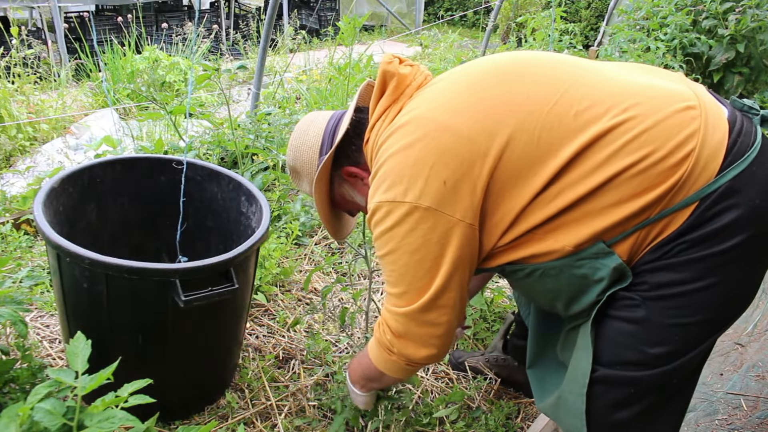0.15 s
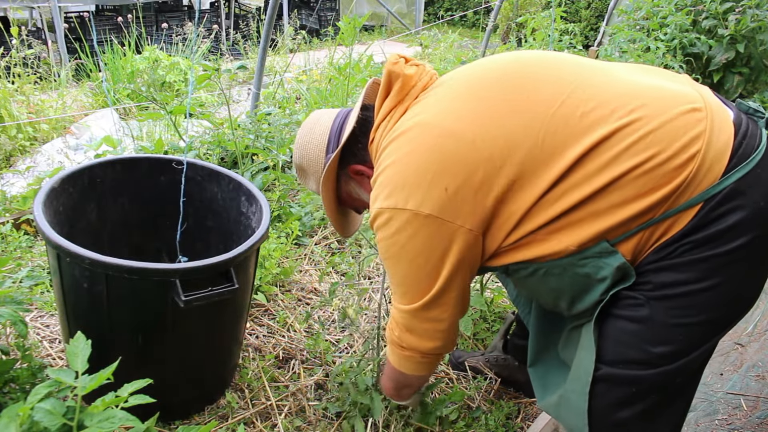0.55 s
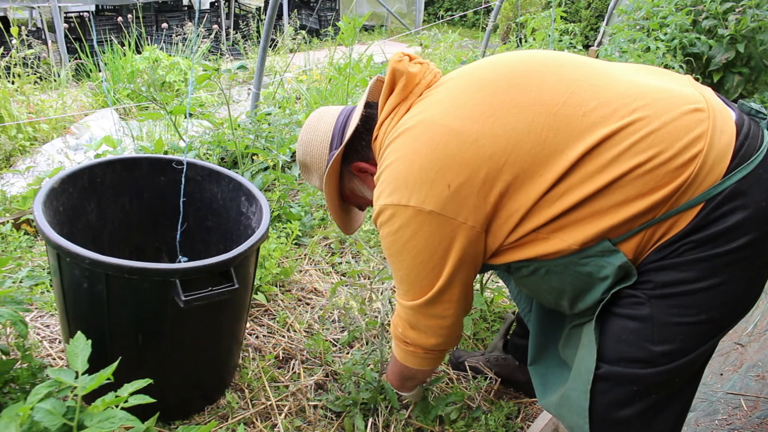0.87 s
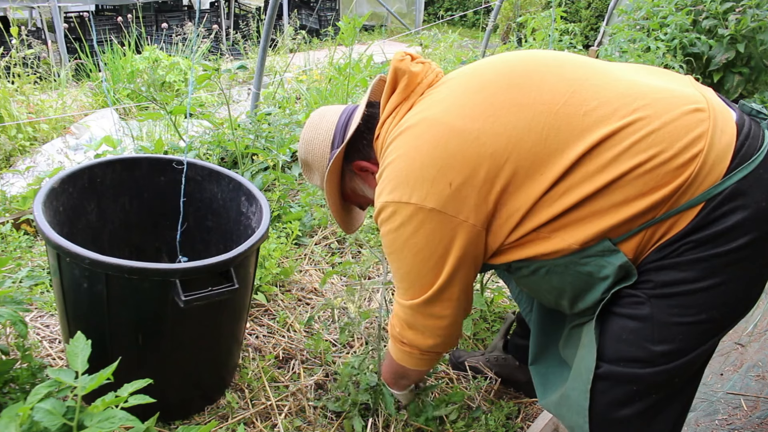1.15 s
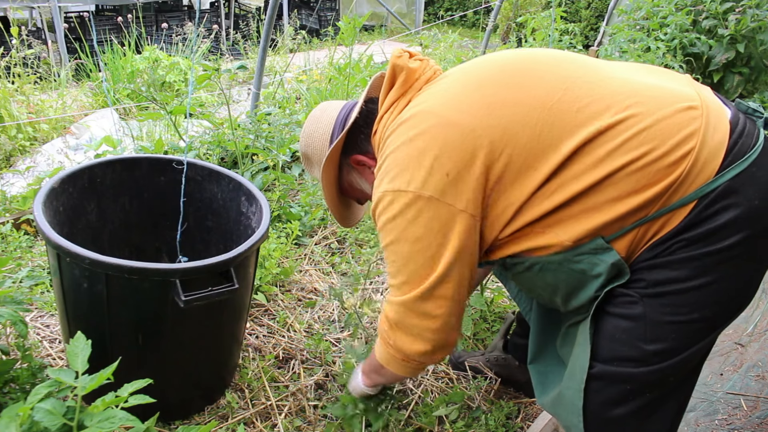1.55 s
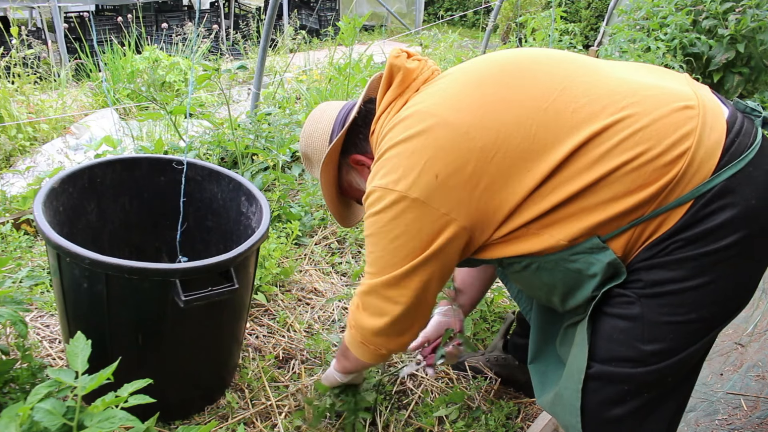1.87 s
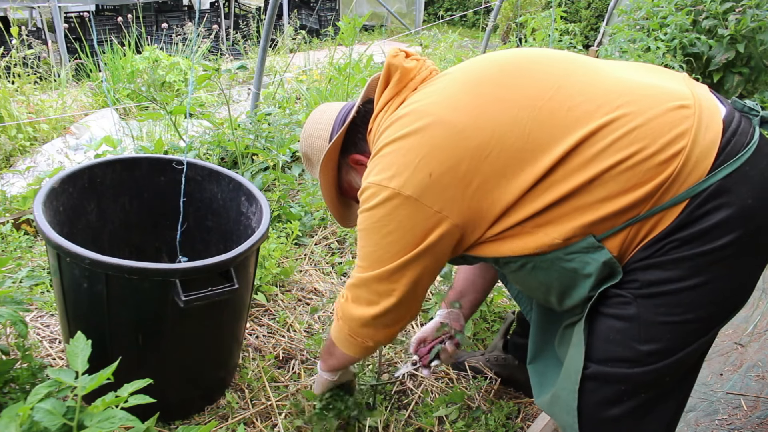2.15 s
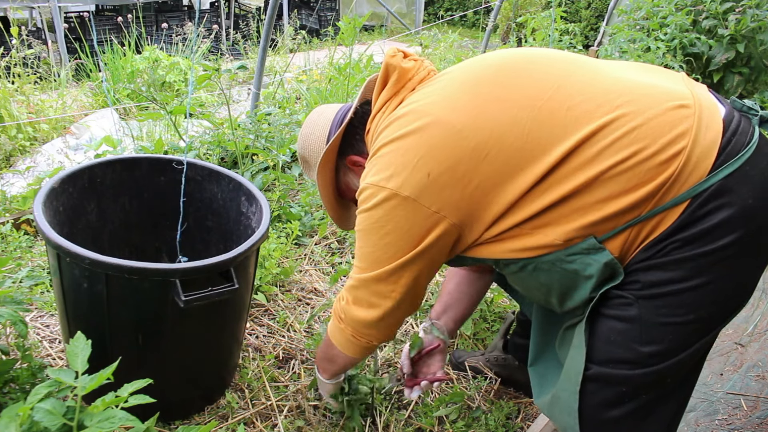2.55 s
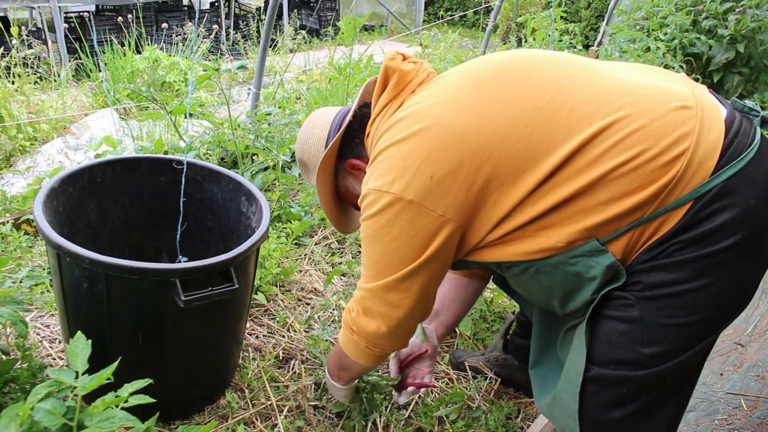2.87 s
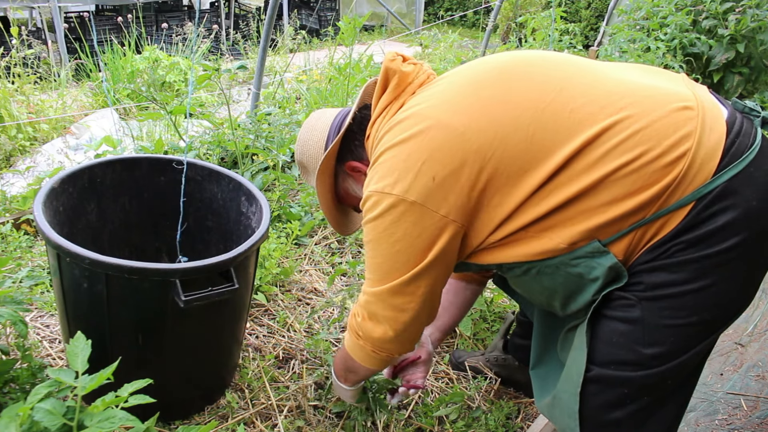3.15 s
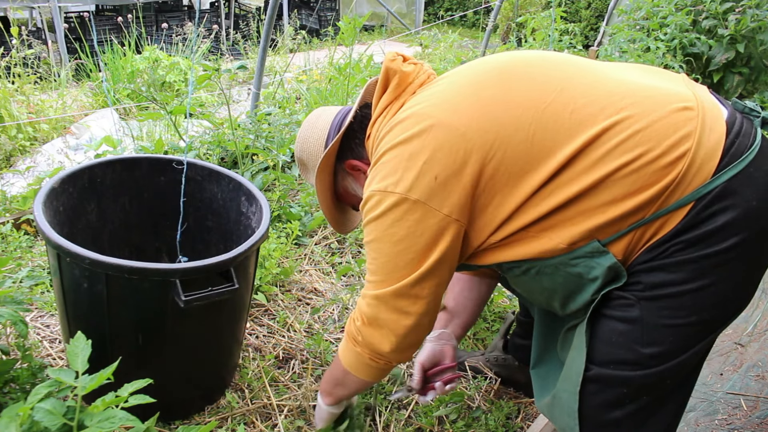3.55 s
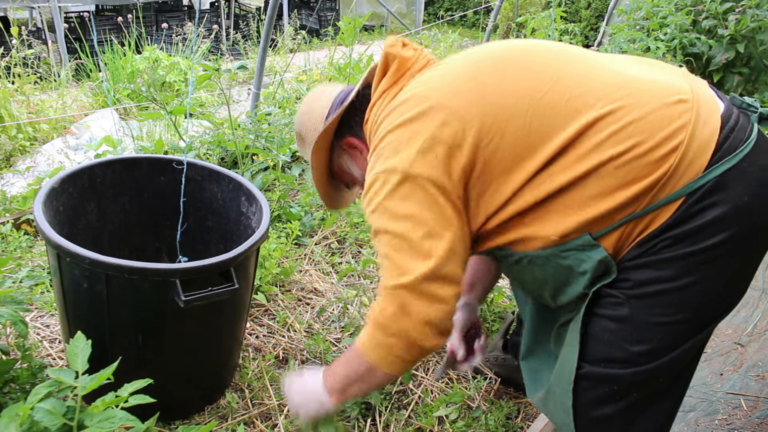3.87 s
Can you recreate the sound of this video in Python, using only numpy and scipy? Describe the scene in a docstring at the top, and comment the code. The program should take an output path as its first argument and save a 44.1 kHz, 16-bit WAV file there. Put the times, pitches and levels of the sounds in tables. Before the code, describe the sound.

Hand pruning shears cut two plant shoots, about two seconds apart, each with a crunch and a sharp snap close by. Leaves rustle softly between the cuts, and birds sing faintly outside a quiet greenhouse.

```python
"""Quiet greenhouse air, a camera's faint buzz and lens ticks, leaves rustling under a gardener's hands.
Birds sing outside: gliding whistles with the garden's echo.
Pruning shears cut two shoots: fibres crunch as the blade bites, then the stem snaps and splinters.
Dry stalks flick against each other now and then."""
import sys
import numpy as np
from scipy import signal
from scipy.fft import rfft, irfft, next_fast_len
from scipy.io import wavfile
from scipy.ndimage import uniform_filter1d

SR = 44100
rng = np.random.default_rng(int(sys.argv[2]) if len(sys.argv) > 2 else 0)


def master(y):
    """Save y as 16-bit WAV."""
    cut = np.clip(np.atleast_2d(y).T, -1, 1)
    pcm = np.round(cut * 32767)  # scale
    wavfile.write(sys.argv[1], SR, pcm.astype(np.int16))


N = 176400

# garden reverberation: freq_hz, t60_s
GARDEN_DECAY = [(500, 0.84), (2000, 0.39), (5000, 0.53)]


def amp(db):
    """Decibels to gain."""
    return 10 ** (np.asarray(db) / 20)


def unit_rms(x):
    """Scales to rms 1."""
    return x / np.sqrt(np.mean(abs(x) ** 2) + 1e-20)


def curve_at(points, hz):
    """Interpolates a table over log frequency."""
    freq_hz, value = np.transpose(points)
    return np.interp(np.log(hz + 1), np.log(freq_hz + 1), value)


def add(mix, start_s, sound):
    """Mixes a sound in at start_s."""
    part = mix[max(round(start_s * SR), 0):][:len(sound)]
    part += sound[:len(part)]


def colour(x, spectrum, tilt_db_per_oct=0):
    """Filters by a spectrum, tilted above 500 Hz; output rms 1."""
    hz = np.fft.rfftfreq(len(x), 1 / SR)
    octaves = np.log2(np.maximum(hz, 500) / 3000)
    gain = amp(curve_at(spectrum, hz) + tilt_db_per_oct * octaves)
    return unit_rms(irfft(rfft(x) * gain, len(x)))


def grains(n, per_s, spread_db):
    """Random clicks of uneven size."""
    size = amp(spread_db * np.minimum(rng.exponential(1, n), 4))
    return size * rng.choice([-1, 1], n) * (rng.random(n) < per_s / SR)


def decay(t, t60_s):
    """Envelope falling 60 dB in t60_s."""
    return amp(-60 * t / t60_s)


def reverb(x, decays):
    """Diffuse tail, each band dying at its own rate."""
    hz, t, noise = signal.stft(rng.standard_normal(SR // 2), SR, nperseg=256)
    tail = signal.istft(noise * decay(t, curve_at(decays, hz)[:, None]), SR, nperseg=256)[1]
    tail *= np.minimum(np.arange(len(tail)) / SR / 0.00082, 1)
    return signal.fftconvolve(x, tail / np.linalg.norm(tail))[:N]


def ping(t, hz, t60_s):
    """One damped mode."""
    return np.sin(2 * np.pi * hz * t) * decay(t, t60_s)


def whistle(length_s, first_hz, middle_hz, last_hz, level_db, blur_hz, taper):
    """Gliding tone; blur_hz scatters amplitude and phase, taper rounds the ends."""
    progress = np.linspace(0, 1, max(round(length_s * SR), 8))
    pitch_hz = np.polyval(np.polyfit([0, .5, 1], [first_hz, middle_hz, last_hz], 2), progress)
    carrier = np.exp(2j * np.pi * np.cumsum(pitch_hz) / SR)
    offset_hz = np.fft.fftfreq(next_fast_len(len(progress) + SR // 2), 1 / SR)
    sidebands = np.exp(2j * np.pi * rng.random(len(offset_hz)) - (offset_hz / blur_hz) ** 2)
    scatter = unit_rms(np.fft.ifft(sidebands)[:len(progress)])
    envelope = abs(np.sin(np.pi * progress)) ** taper
    return amp(level_db) * unit_rms((scatter * carrier).real * envelope)


def air(level_db=-51, patch_db=.9):
    """Soft stereo wash and hiss, drifting in patches."""
    # air spectrum: freq_hz, density_db
    spectrum = [(20, 1), (45, -4.5), (100, -4), (250, -7), (550, -6), (1000, -8), (2000, -11.5),
                (4200, -13), (5600, -14), (9000, -16.5), (15500, -14.5)]
    # left-right likeness: freq_hz, correlation
    likeness = [(50, 0.87), (200, 0.87), (600, 0.844), (2500, 0.9826), (5000, 0.93), (8000, 0.3),
                (14000, 0.31)]
    frames, hz = N // 256 + 5, np.fft.rfftfreq(1024, 1 / SR)
    re, im, side_re, side_im, patches = rng.standard_normal((frames, len(hz), 5)).T
    patches = unit_rms(uniform_filter1d(uniform_filter1d(patches, size=12, axis=0), size=18, axis=1))
    correlation = curve_at(likeness, hz)[:, None]
    left = re + 1j * im
    right = correlation * left + np.sqrt(1 - correlation ** 2) * (side_re + 1j * side_im)
    gain = amp(curve_at(spectrum, hz)[:, None] + patch_db * patches)
    wash = signal.istft(np.array([left, right]) * gain, nperseg=1024, noverlap=768)[1]
    return amp(level_db) * unit_rms(wash[:, :N])


def camera_buzz(level_db=-57.5, scan_hz=69.58, spike_hz=1025, spikes_per_scan=6):
    """The electronics leak a burst of spikes and hiss on every scan."""
    # buzz spectrum: freq_hz, gain_db
    spectrum = [(1000, -40), (3000, -7.5), (6000, -2), (9200, 0.5), (12300, -1.5), (15500, -11)]
    offset_scans, scan_jitter_s, spike_jitter_s = .29, 5e-5, 1e-5
    scans_s = (np.arange(int(N / SR * scan_hz)) + offset_scans) / scan_hz
    scans_s += rng.normal(0, scan_jitter_s, len(scans_s))
    spikes_s = scans_s[:, None] + np.arange(spikes_per_scan) / spike_hz
    spikes_s += rng.normal(0, spike_jitter_s, spikes_s.shape)
    spikes = np.zeros(N)
    spikes[np.round(spikes_s * SR).astype(int) % N] = 1
    in_burst = (np.arange(N) / SR * scan_hz - offset_scans) % 1 < spikes_per_scan * scan_hz / spike_hz
    hiss = 0.102 * in_burst * rng.standard_normal(N)
    return amp(level_db) * colour(spikes - spikes.mean() + hiss, spectrum)


def lens_ticks(level_db=-46, cycle_s=.36, step_s=.08, t60_s=0.031):
    """The focus motor ticks softly in groups of four."""
    # lens resonances: freq_hz, gain_db
    modes = [(470, -5), (720, -1.5), (950, -7)]
    out, t = np.zeros(N), np.arange(SR // 25) / SR
    for group_s in np.arange(.006, N / SR, cycle_s):
        for step in range(4):
            tick = sum(amp(db) * ping(t, hz * rng.normal(1, 0.0263), t60_s) for hz, db in modes)
            add(out, group_s + step * step_s, amp(rng.normal(level_db, 2.2)) * tick)
    return out


def leaves():
    """Swells of fine crackle as hands part the plants."""
    # Gaussian swells: centre_s, sigma_s, level_db, tilt_db_per_oct
    rustles = [(.13, 0.17, -62, -30), (0.428, 0.046, -53, 5), (1.622, 0.078, -49.5, 4),
               (1.982, 0.095, -50, 4.5), (2.143, 0.035, -48.5, 4.5), (2.458, 0.15, -51, 2),
               (3.309, 0.013, -44, 18), (3.508, 0.053, -47.5, 7.5), (3.818, 0.13, -47.5, 4.5)]
    # leaf spectrum: freq_hz, gain_db
    spectrum = [(100, 1.5), (400, 5.5), (1300, 12), (3500, 8), (6000, -6.5), (9000, -14), (11500, -11),
                (15000, -17)]
    out, t = np.zeros(N), np.arange(-SR // 4, SR // 4) / SR
    for centre_s, sigma_s, level_db, tilt_db_per_oct in rustles:
        crackle = colour(grains(len(t), per_s=1700, spread_db=3.2), spectrum, tilt_db_per_oct)
        add(out, centre_s + t[0], amp(level_db) * crackle * np.exp(-(t / sigma_s) ** 2 / 2))
    return out


def garden_whistles(notes, wet_db, taper):
    """Single bird notes with the garden's echo."""
    out = np.zeros(N)
    for start_s, *shape in notes:
        add(out, start_s, whistle(*shape, taper))
    return out + amp(wet_db) * reverb(out, GARDEN_DECAY)


def far_birds():
    """Whistles blurred by distance."""
    # far notes: start_s, length_s, first_hz, middle_hz, last_hz, level_db, blur_hz
    notes = [(.08, 0.36, 5030, 4700, 4830, -66.5, 248), (.62, 1.77, 3836, 3650, 3320, -58, 810),
             (2.225, 0.0558, 3370, 3710, 3030, -53, 386), (2.275, 0.05, 2984, 2850, 2600, -50.5, 389),
             (2.402, 0.026, 3350, 3100, 2710, -46, 156), (2.41, .13, 2800, 2900, 3240, -51, 660),
             (2.39, .25, 3750, 3910, 4270, -51, 350), (2.65, .12, 3995, 3900, 3744, -54, 386),
             (2.74, 0.0973, 2778, 2560, 2500, -54, 460), (2.86, 0.092, 2630, 3920, 2954, -54.5, 392),
             (3.335, 0.207, 1760, 1800, 1753, -50.5, 300)]
    return garden_whistles(notes, wet_db=-0.5, taper=0.2)


def songbird(foliage_db=-6, wet_db=-5):
    """Five rough slurred syllables, then four quicker, cleaner stepped ones."""
    # notes of one syllable: offset_s, length_s, first_hz, middle_hz, last_hz, gain_db
    slur_notes = [(-.014, .018, 5000, 4750, 4400, -13), (.003, .031, 3500, 4100, 4220, .5),
                  (.036, .024, 3500, 3850, 4050, -1.5), (.054, .022, 4050, 3900, 3500, -.5),
                  (.072, .024, 3300, 2950, 2350, -2)]
    step_notes = [(0, .021, 4450, 3950, 3350, -3), (.017, .028, 3300, 3350, 3320, -2),
                  (.048, .032, 3250, 2900, 2200, 1)]
    # syllables: start_s, level_db, pitch_ratio
    slurs = [(.729, -49, 1.027), (.940, -48, 1.005), (1.141, -46.5, 1.02), (1.328, -47, 1), (1.531, -47, 1)]
    steps = [(1.682, -47.5, 1), (1.812, -47.5, 1.04), (1.938, -47.5, .97), (2.073, -48.5, 1.026)]
    # quick scatter off leaves: freq_hz, t60_s
    foliage = [(2000, 0.13), (5000, 0.031)]
    out = np.zeros(N)
    for syllables, notes, blur_hz in ((slurs, slur_notes, 170), (steps, step_notes, 130)):
        for start_s, level_db, pitch_ratio in syllables:
            for offset_s, length_s, *glide_hz, gain_db in notes:
                pitches_hz = np.array(glide_hz) * rng.normal(pitch_ratio, .008)
                note = whistle(length_s, *pitches_hz, level_db + gain_db, blur_hz, taper=.45)
                add(out, start_s + offset_s, note)
    return out + amp(foliage_db) * reverb(out, foliage) + amp(wet_db) * reverb(out, GARDEN_DECAY)


def stem_crack(ring_hz, t60_s, edge_db, band_hz):
    """Short ring with a bright edge, in the band of the cut."""
    t = np.arange(SR // 20) / SR
    edge = np.gradient(rng.standard_normal(len(t)) * decay(t, t60_s=0.0021))
    crack = ping(t, ring_hz, t60_s) + amp(edge_db) * edge / abs(edge).max()
    return signal.sosfilt(signal.butter(4, band_hz, "band", fs=SR, output="sos"), crack)


def shears(fibres_per_s=9000, spread_db=2.2, rise_db_per_s=255, wet_db=-17.5):
    """The blade crunches through fibres, the stem cracks and splinters; nearby surfaces reflect it."""
    # cracks of the stems, with one click of the blade at 3.3254 s: start_s, gain_db, ring_hz, t60_s, edge_db
    cracks = [(1.2440, -29.5, 1940, 0.0067, -14), (1.2526, -24, 4140, 0.004, -9),
              (1.275, -30.5, 5130, 0.006, -14), (1.2855, 0, 1870, 0.0025, -6),
              (1.2860, -5, 4330, 0.0027, -10), (1.2876, -9, 2660, 0.0022, -4),
              (1.2871, -8, 3700, 0.0047, 1), (1.2910, -21, 5030, 0.011, -8),
              (1.2916, -17.5, 7880, 0.013, -20), (3.2924, -15.5, 3050, 0.0012, -12),
              (3.3044, -16.5, 3250, 0.00394, -25), (3.3119, -17.5, 1680, 0.0088, -16.5),
              (3.3157, -21, 1370, 0.0107, -20), (3.3170, -15, 4320, 0.0097, -20),
              (3.3208, 0.5, 2086, 0.0095, -20), (3.3231, -10.5, 2260, 0.016, -18),
              (3.3254, -23, 6940, 0.0057, -20), (3.373, -32.5, 3660, 0.015, -1),
              (3.463, -27, 1800, 0.0046, -14)]
    # cuts: bite_s, snap_s, bite_db, splinter_db, splinter_t60_s, splinter_db_per_oct, low_hz, high_hz
    cuts = [(1.2712, 1.287, -30, -26.5, 0.12, 4, 656, 6390),
            (3.2800, 3.3205, -32, -27, 0.081, -3.5, 320, 10700)]
    # breaking-fibre spectrum: freq_hz, gain_db
    crunch = [(80, -17), (300, -12), (800, -19), (1500, -4), (3700, -3), (5200, -7.5), (6800, -20),
              (8300, -21.5), (10000, -24.5), (15000, -34.5)]
    # ground, tub and wall reflections: delay_s, gain_db
    echoes = [(.0053, -15.5), (.0092, -34), (.0190, -31), (0.0292, -23)]
    # greenhouse reverberation: freq_hz, t60_s
    room = [(200, 0.066), (2000, 0.29), (5000, 0.45), (12000, 0.197)]
    direct, t = np.zeros(N), np.arange(SR // 6) / SR
    for start_s, gain_db, *shape in cracks:
        nearest_cut = min(cuts, key=lambda cut: abs(cut[1] - start_s))
        add(direct, start_s, amp(gain_db) * stem_crack(*shape, band_hz=nearest_cut[-2:]))
    for bite_s, snap_s, bite_db, splinter_db, splinter_t60_s, splinter_db_per_oct, low_hz, _ in cuts:
        highpass = signal.butter(2, low_hz, "high", fs=SR)
        to_snap_s = snap_s - bite_s - t
        fibres = colour(grains(len(t), fibres_per_s, spread_db), crunch, tilt_db_per_oct=-2.5)
        bite = signal.lfilter(*highpass, fibres) * amp(bite_db - rise_db_per_s * to_snap_s)
        add(direct, bite_s, bite[to_snap_s > 0])
        splinters = colour(grains(len(t), fibres_per_s, spread_db), crunch, splinter_db_per_oct)
        snap = signal.lfilter(*highpass, splinters) * decay(t, splinter_t60_s)
        add(direct, snap_s, amp(splinter_db) * snap)
    out = direct + amp(wet_db) * reverb(direct, room)
    for delay_s, gain_db in echoes:
        add(out, delay_s, amp(gain_db) * direct)
    return out


def stalks():
    """Thin dry stalks flick together with a brief, high crackle."""
    # flicks: start_s, peak_db, ring_hz
    flicks = [(1.587, -41, 12500), (1.619, -39, 11800), (1.9588, -36, 11460), (3.878, -37, 13700)]
    out, t = np.zeros(N), np.arange(SR // 20) / SR
    for start_s, peak_db, ring_hz in flicks:
        slips = rng.standard_normal(len(t)) * decay(t, t60_s=0.016)
        tick = signal.fftconvolve(slips, ping(t, ring_hz, t60_s=0.0021))
        add(out, start_s, amp(peak_db) * tick / abs(tick).max())
    return out


def long_call(blur_hz=40.6, upper_ratio=1.78, upper_db=-8, wet_db=-6):
    """A far bird's broken call: swelling notes with a rough upper partial."""
    # call notes: start_s, length_s, pitch_hz, level_db
    notes = [(2.36, 0.14, 1055, -57.5), (2.54, 0.075, 1055, -53), (2.69, 0.14, 1000, -56.5),
             (2.86, 0.25, 1040, -64)]
    out = np.zeros(N)
    for start_s, length_s, pitch_hz, level_db in notes:
        lower_hz, upper_hz = [pitch_hz] * 3, [pitch_hz * upper_ratio] * 3
        add(out, start_s, whistle(length_s, *lower_hz, level_db, blur_hz, taper=0.71))
        add(out, start_s, whistle(length_s, *upper_hz, level_db + upper_db, 2 * blur_hz, taper=0.53))
    return out + amp(wet_db) * reverb(out, GARDEN_DECAY)


def fluting_bird():
    """A nearer bird's purer whistles."""
    # fluted notes: start_s, length_s, first_hz, middle_hz, last_hz, level_db, blur_hz
    notes = [(3.17, 0.086, 1860, 2056, 2107, -56.5, 39.96), (3.235, 0.052, 2500, 2380, 2220, -49.5, 32.4),
             (3.615, 0.272, 2168, 2126, 2092, -50, 74.6), (3.635, 0.08, 2100, 2100, 2110, -42.5, 25.2),
             (3.835, 0.055, 2087, 2095, 2020, -40.5, 25)]
    return garden_whistles(notes, wet_db=-8, taper=0.45)


def scene():
    """All sources centred; only the air has width."""
    birds = songbird() + long_call() + far_birds() + fluting_bird()
    return air() + shears() + leaves() + stalks() + birds + camera_buzz() + lens_ticks()


def record(dry, cutoff_hz=15800):
    """Clip at full scale, then low-pass."""
    lowpass = signal.firwin(511, cutoff_hz, window=("kaiser", 9), fs=SR)
    return signal.oaconvolve(np.clip(dry, -1, 1), lowpass[None], "same")


dry = scene()
out = record(dry)
master(out)
```